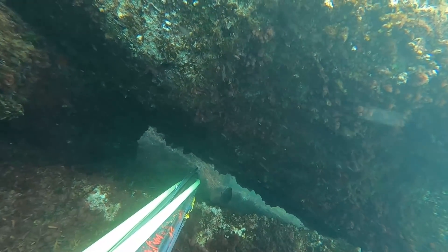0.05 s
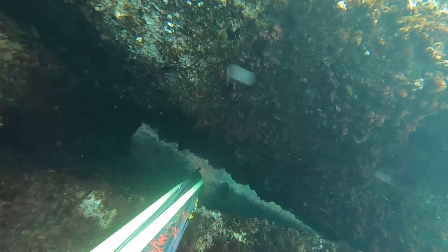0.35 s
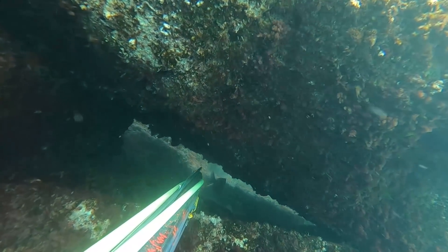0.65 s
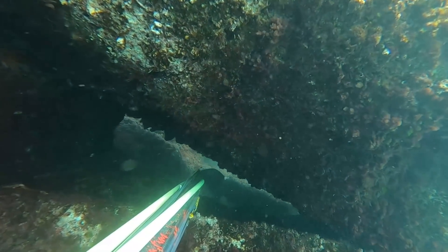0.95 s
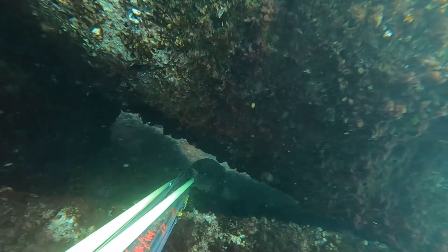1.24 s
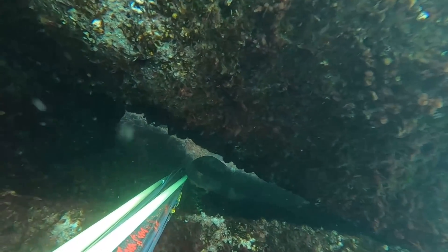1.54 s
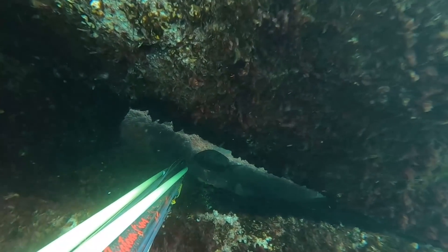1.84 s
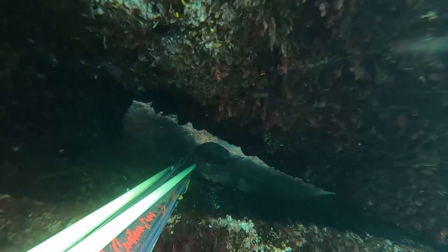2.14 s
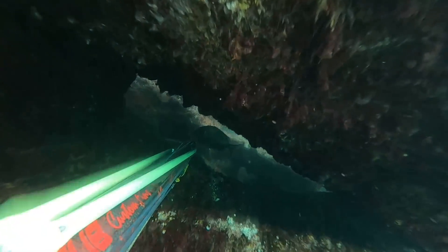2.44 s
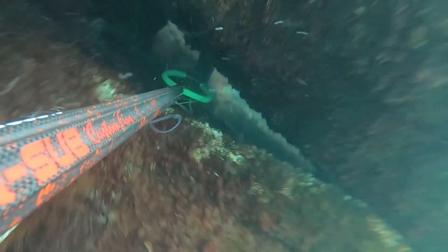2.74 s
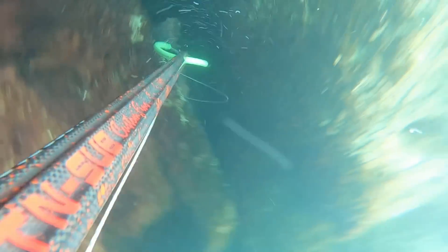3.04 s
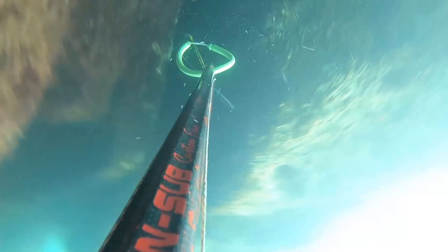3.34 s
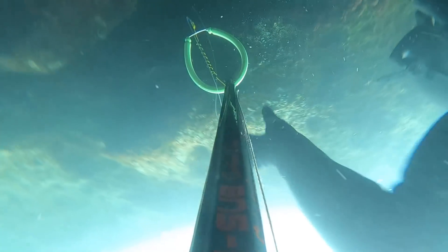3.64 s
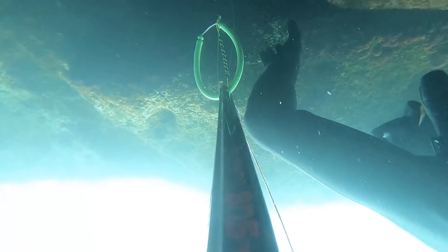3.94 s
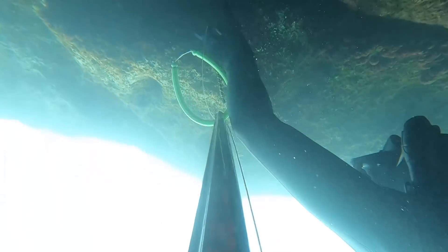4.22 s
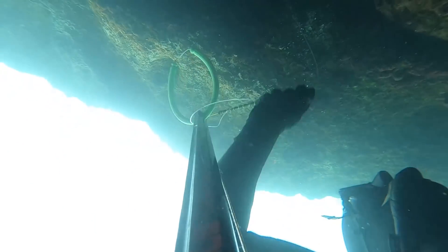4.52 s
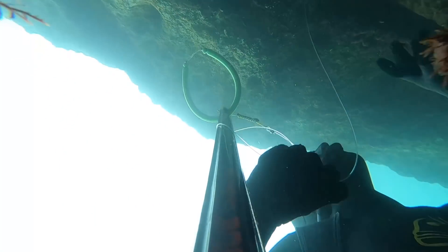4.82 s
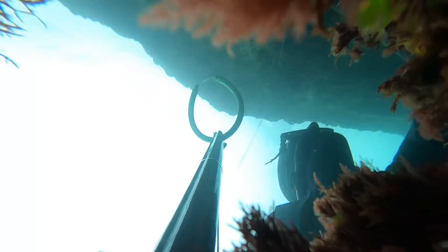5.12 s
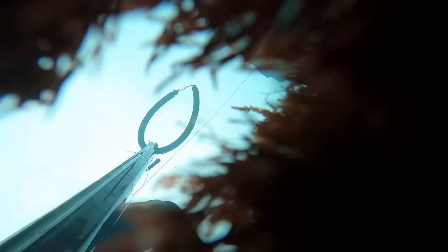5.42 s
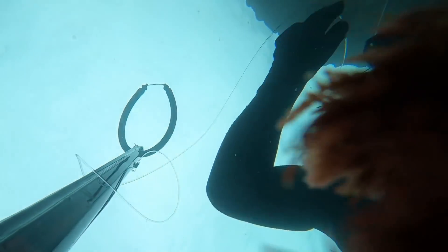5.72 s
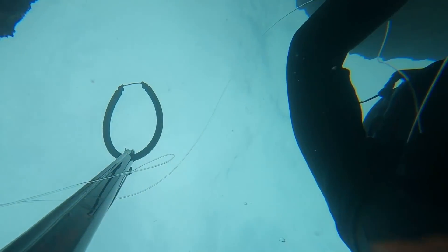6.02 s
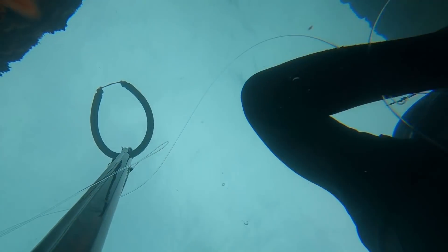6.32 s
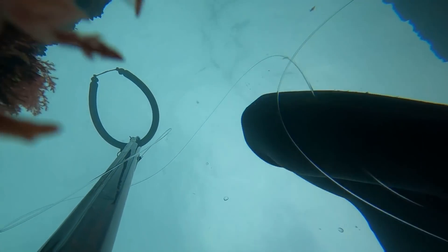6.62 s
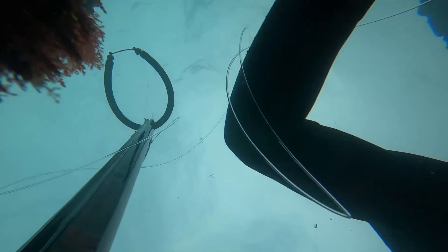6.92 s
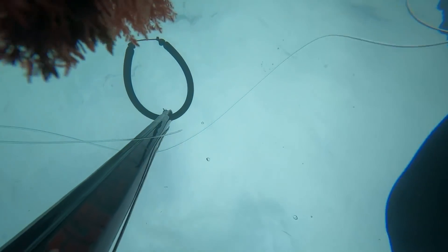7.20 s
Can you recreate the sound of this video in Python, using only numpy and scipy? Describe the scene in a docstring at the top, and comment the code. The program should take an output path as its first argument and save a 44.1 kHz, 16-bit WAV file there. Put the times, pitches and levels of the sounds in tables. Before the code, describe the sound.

A microphone in a housing on a speargun picks up the deep, fluttering rumble of water and tiny shrimp snaps. The gun goes off with a sharp, booming clack and rattling rebounds. Jerky rubs, knocks and short squeaks of line and rubber ring the barrel, growing louder as the water surges. Then come dry knocks and rustling from seaweed, a faint rasp of running line and a brief bubbly glug.

```python
"""Speargun shot under water

A camera in its housing rides on the barrel of a speargun, which sways and rumbles in the flow while
shrimp tick. The gun fires; line and rubber bands then drag and squeak by stick-slip friction, ringing
the hollow barrel. The diver pushes through seaweed, which brushes and knocks the housing, and a few
air pockets glug as they break loose."""
import sys
import numpy as np
from scipy import signal
from scipy.fft import rfft, irfft
from scipy.io import wavfile
from scipy.ndimage import uniform_filter1d

SR = 44100
rng = np.random.default_rng(int(sys.argv[2]) if len(sys.argv) > 2 else 0)


def persist_wave(psi):
    """Save psi, clipped to +-1, as 16-bit WAV."""
    counts = np.round(np.clip(psi, -1, 1) * 32767).astype(np.int16)
    wavfile.write(sys.argv[1], SR, np.atleast_2d(counts).T)


N = 320166
T = np.arange(N) / SR

# the shot, its rebounds and other blows on the gun:
# (time [s], boom pitch [Hz], boom level [dB], boom t60 [s], crack level [dB])
GUN_BLOWS = [(1.298, 98, -23.5, 0.14, -74), (1.9, 126, -37, 0.17, -73), (2.092, 233, -44.5, 0.032, -50.5),
             (2.529, 390, -33, 0.015, -35.5), (2.54, 200, -15, 0.032, -46), (2.544, 1130, -31, 0.038, -32),
             (2.551, 450, -2, 0.031, -12.5), (2.57, 850, 1.5, 0.0046, -8), (2.572, 186, 9.5, 0.012, -24),
             (2.582, 430, -0.5, 0.028, -27), (2.585, 170, 5.5, 0.012, -31), (2.587, 530, -9, 0.018, -30),
             (2.59, 1000, -16, 0.022, -24), (2.606, 1350, -21.5, 0.015, -33),
             (2.6225, 680, -17.5, 0.014, -32), (2.625, 115, 1.5, 0.022, -48),
             (2.636, 480, -15.5, 0.036, -43), (2.651, 520, -13.5, 0.018, -35), (2.654, 230, -5, 0.014, -45),
             (2.668, 1000, -22.5, 0.041, -27.5), (2.688, 600, -18, 0.017, -23),
             (2.841, 440, -19, 0.024, -38), (2.864, 450, -26.5, 0.041, -45.5),
             (2.993, 511, -20.5, 0.042, -39), (3.044, 480, -25, 0.023, -52),
             (3.133, 484, -25, 0.026, -54.5), (3.501, 460, -21.5, 0.04, -36.5),
             (3.701, 490, -44, 0.025, -29.5), (3.815, 460, -41, 0.062, -13.5), (3.909, 124, -5, 0.023, -53),
             (4.004, 404, -29, 0.024, -46), (4.361, 94, -12, 0.11, -63.5), (4.3965, 640, -9, 0.013, -35),
             (4.5335, 590, -12, 0.018, -32.5), (4.578, 290, -22, .03, -48),
             (4.7315, 593, -15, 0.014, -22.5), (4.7335, 415, -2, 0.017, -33)]
# modes of the hollow barrel: (frequency [Hz], bandwidth [Hz], gain [dB], left minus right [dB])
BARREL_MODES = [(224, 44, -7.5, -0.5), (266.3, 39, 4.5, -0.5), (333, 16, 7.5, -2.5), (456.5, 28, 2, 1),
                (509, 40, 4, -1), (580, 55, 7, -0.5), (698, 130, -8, 1), (796, 72, -4.5, 1.5),
                (878, 119, -2.5, -5.5), (1228, 600, -14, 17), (1347, 85, 4, 5.5), (1600, 29, -10.5, 3),
                (1780, 26, -7.5, -2), (2230, 170, -13.5, 6.5), (2610, 110, -12.5, 9),
                (3080, 120, -11.5, 3.5), (3300, 32, -16, -3), (3630, 280, -21.5, -7), (4460, 510, -31, -4),
                (5670, 250, -28.5, -14.5), (6250, 110, -33, -11)]
# spectrum of a crack on the gun: (frequency [Hz], gain [dB])
CRACK_SPECTRUM = [(300, 1.5), (700, 8), (1500, 0.5), (2200, 1), (3150, -2.5), (4100, -14), (6000, -16.5),
                  (8500, -36.5), (11000, -35), (15000, -56)]
def gun_blows():
    """Impact excitation: each blow booms, cracks and briefly rings the barrel's modes."""
    booms, cracks = impacts(GUN_BLOWS)
    cracks = undb(2) * colour(cracks, CRACK_SPECTRUM)
    ring = undb(-10) * ring_modes(booms, BARREL_MODES)
    ring += undb(-7) * ring_modes(band(cracks, 700, 4000), BARREL_MODES)
    return undb(1.5) * booms + cracks + ring + undb(6) * resonate(cracks, 3050, 450)


# the spear running along the barrel: (time [s], level [dB])
RUSH_LEVEL = [(2.538, -50.5), (2.548, -30.5), (2.565, -39), (2.585, -29.5), (2.595, -44.5), (2.603, -52.5),
              (2.67, -48.5), (2.70, -65)]
def spear_rush():
    """Sliding friction: the spear running along the barrel makes a short broadband rush."""
    noise = colour(grit(4400, 1.5, 2700), CRACK_SPECTRUM)
    return steady(noise, .023) * envelope(RUSH_LEVEL)


# pulls of the line on the barrel: (start [s], end [s], level [dB], treble over bass [dB])
LINE_PULLS = [(2.716, 2.72, -35, -16), (2.778, 2.785, -48, -16), (2.834, 2.848, -37, -12.5),
              (2.856, 2.863, -38.5, -14), (2.884, 2.897, -32.5, -22), (2.909, 2.942, -35.5, -21),
              (2.96, 2.963, -35, -7), (2.992, 2.996, -23, -26), (3.038, 3.043, -26.5, -34),
              (3.081, 3.11, -36, -23), (3.129, 3.169, -37, -25), (3.184, 3.203, -33, -23.5),
              (3.241, 3.264, -34, -28.5), (3.312, 3.334, -25.5, -35), (3.333, 3.425, -24, -30),
              (3.469, 3.477, -42, -28), (3.499, 3.507, -26.5, -24), (3.532, 3.539, -29, -12.5),
              (3.549, 3.553, -32.5, -12), (3.567, 3.575, -27.5, -14.5), (3.582, 3.608, -34.5, -13.5),
              (3.621, 3.627, -38.5, -14), (3.63, 3.636, -39, -8.5), (3.644, 3.662, -52, -10),
              (3.693, 3.714, -39.5, -10), (3.745, 3.771, -40, -14.5), (3.782, 3.798, -42, -4.5),
              (3.816, 3.833, -31.5, -14.5), (3.912, 3.923, -26.5, -26.5), (3.947, 3.957, -36, -24),
              (3.962, 3.964, -22.5, -21.5), (3.992, 3.997, -25, -28.5), (4.002, 4.007, -25.5, -25.5),
              (4.013, 4.023, -28, -27), (4.036, 4.043, -21.5, -20.5), (4.318, 4.338, -24.5, -21.5),
              (4.345, 4.35, -26.5, -20), (4.392, 4.443, -20.5, -16), (4.455, 4.483, -29.5, -16.5),
              (4.49, 4.519, -23, -20.5), (4.533, 4.539, -12, -25), (4.574, 4.579, -25.5, -28),
              (4.6, 4.603, -29, -23), (4.628, 4.638, -27, -24), (4.705, 4.725, -20, -16),
              (4.735, 4.742, -15.5, -34), (4.784, 4.796, -15.5, -22), (4.816, 4.847, -32, -18.5),
              (4.881, 4.901, -30, -24.5), (5.287, 5.324, -19, -33), (5.341, 5.345, -24.5, -9),
              (5.438, 5.48, -28, -32), (5.59, 5.667, -29.5, -30)]
def line_scrapes():
    """Stick-slip friction: each pull is a train of random slips that ring the barrel."""
    out, responses = np.zeros((2, N)), slip_responses()
    for start, end, db, bright_db in LINE_PULLS:
        t = T[:max(int((end - start) * SR), 1)]
        chance, size = rng.random(SR // 4)[:len(t)], rng.standard_normal(SR // 4)[:len(t)]
        slips = (chance < 700 / SR) * size * np.exp(-t / .22)
        slips[0] = 2.34  # the line breaks free with a jerk
        for response, bright_share in zip(responses, (0, .65, 1)):
            pull = signal.fftconvolve(response, slips[None], axes=1)
            pull *= np.sqrt(len(t) / pull.shape[1]) / rms(pull)  # energy follows duration
            add(out, start, pull * undb(db + bright_share * bright_db - 3))
    return out


def slip_responses():
    """Dispersion: one slip runs down the barrel as a chirp, returned as low, middle and high bands."""
    chirp = disperse(signal.unit_impulse(4096), lag_s=.0025)
    ring = ring_modes(chirp, BARREL_MODES)
    low, middle = band(ring, 150, 826, order=5), band(ring, 803, 1956, order=5)
    high = band(ring, 1900, 3480, order=5) + undb(-4.5) * band(ring, 5230, 6250)
    high += undb(-21) * band(ring, 4000, 13000)
    return low, middle, high


# slack line trailing along the barrel: (start [s], end [s], level [dB])
LINE_TRAILS = [(2.64, 2.81, -44), (2.89, 3.0, -44.5), (3.13, 3.42, -44), (3.56, 3.84, -55.5),
               (4.25, 4.84, -47)]
def trailing_line():
    """Sliding friction: the slack line's dense, tiny slips merge into a dull rub."""
    low, middle, high = slip_responses()
    response = low + undb(-18) * middle + undb(-17.5) * high
    level = swells(LINE_TRAILS, attack_s=.01, release_s=.028) * undb(6 + 1.6 * wander(40))
    rub = signal.oaconvolve(grit(1000, 5.4, 5000), response, axes=1)[:, :N]
    return steady(rub, .14) * level


# rubber, line and weed squeaking: (start [s], end [s], first slip rate [Hz], midway rate [Hz],
# last rate [Hz], level [dB], unevenness of the rate [0-1])
SQUEAK_GLIDES = [(2.758, 2.777, 496, 527, 555, -32, 0), (2.959, 2.966, 2230, 2300, 2420, -38.5, 0.02),
                 (3.078, 3.095, 887, 1080, 1450, -40, 0.05), (3.138, 3.206, 483.2, 577, 775, -22.5, .04),
                 (3.327, 3.442, 345.3, 333, 317, -29, 0.04), (3.405, 3.422, 606, 575, 470, -24, 0.1),
                 (4.392, 4.404, 521, 660, 800, -14, 0.22), (4.402, 4.42, 1276, 1740, 1420, -16.5, 0.18),
                 (4.423, 4.445, 1159, 912, 560, -19, 0.11), (4.426, 4.438, 2100, 2230, 2170, -23.5, 0),
                 (4.469, 4.478, 1210, 1413, 1740, -16.5, 0.11), (4.489, 4.504, 1639, 1267, 750, -13, .15),
                 (4.499, 4.523, 548.6, 403, 298, -10, 0), (4.533, 4.545, 616, 428, 320, -17, 0.09),
                 (5.082, 5.1, 536, 684, 1080, -24.5, 0.18), (5.288, 5.303, 1380, 1455, 1550, -25.5, .14),
                 (5.311, 5.32, 1600, 1745, 1830, -21, 0.05), (5.296, 5.339, 635, 594, 555, -25, 0.02),
                 (5.448, 5.483, 580.4, 591, 586, -22.5, .05), (6.4, 6.423, 4220, 4570, 5140, -40, 0.07),
                 (6.514, 6.515, 2830, 2820, 2950, -27.5, 0), (6.514, 6.515, 5500, 5640, 5840, -37, 0),
                 (6.524, 6.537, 3890, 4960, 7500, -34.5, 0.03), (6.567, 6.655, 3300, 3740, 4040, -43, 0.1)]
def squeaks():
    """Stick-slip oscillation: the slip rate sets the pitch, heard directly and through the barrel."""
    out, jitter = np.zeros((2, N)), wander(700)
    grip = undb(5 * wander(1100))
    crunch = steady(band(rng.standard_normal(N), 500, 2510), .05)
    for start, end, *glide_hz, db, uneven in SQUEAK_GLIDES:
        span = slice(int((start - .02) * SR), int((end + .03) * SR))
        t = T[span]
        progress = (t - start) / (end - start)
        slip_hz = np.interp(progress, [0, .5, 1], glide_hz) * (1 + uneven * jitter[span])
        phase = 2 * np.pi * np.cumsum(slip_hz) / SR
        tone = np.sin(phase) + undb(-19.5) * np.sin(2 * phase)
        slip = (tone + 1.4 * uneven * crunch[span]) * grip[span]  # ragged slips crunch
        squeak = steady(ring_modes(slip, BARREL_MODES), .0048) + undb(-8) * slip
        gate = np.clip(np.minimum(t - start, end - t) / .0057 + 1, 0, 1)
        swell_db = np.interp(progress, [0, .31, 1], [-8.5, 0, -4])  # fades as the grip lets go
        add(out, t[0], squeak * gate * undb(db + swell_db - 4.5))
    return out


def running_line(centre_hz=1070, width_hz=240):
    """Resonant filtering of friction: the line runs out in a grainy rasp under a thin sizzle."""
    slips = grit(900, 2.2, 3000)
    rasp = steady(steep_resonance(slips, centre_hz, width_hz), .36)
    sizzle = undb(-19.5) * steady(band(slips, 4200, 5500), .11)
    return (rasp + sizzle) * swells([(5.737, 6.043, -39)], attack_s=.19, release_s=.17)


# water streaming past the gun: (time [s], level [dB])
FLOW_LEVEL = [(0, -29), (.5, -29), (.75, -24.5), (1.78, -17.5), (1.9, -24.5), (2.02, -18), (2.55, -16.5),
              (2.9, -28.5), (3.33, -26.5), (3.5, -31.5), (3.85, -35.5), (4.28, -28.5), (4.42, -14),
              (4.85, -15), (5.0, -23), (5.25, -14), (5.55, -21.5), (5.88, -34.5), (6.55, -33), (7.26, -33)]
# tugs that make the barrel shudder: (start [s], end [s], level [dB])
BARREL_TUGS = [(2.54, 2.575, -10), (2.7, 2.78, -29.5), (3.05, 3.13, -30), (3.2, 3.85, -40),
               (4.35, 4.41, -20), (4.7, 4.77, -20), (4.84, 4.9, -27.5), (5.12, 5.27, -25), (5.6, 5.66, -28),
               (6.46, 6.82, -36), (7.17, 7.26, -30)]
# jerks on the line that set the barrel swinging: (start [s], end [s], level [dB])
LINE_JERKS = [(3.06, 3.13, -24.5), (3.295, 3.34, -22.5), (3.905, 4.1, -16)]
# bending modes of the barrel: (frequency [Hz], bandwidth [Hz], gain [dB])
BENDING_MODES = [(57, 38, -15.5), (94.2, 11, -1.5)]
def barrel_rumble(sway_hz=20.9):
    """Forced beam vibration: the lowest mode sways; eddies, tugs, weed and line drive higher ones."""
    flow, contact = envelope(FLOW_LEVEL), envelope(WEED_CONTACT)
    tug = swells(BARREL_TUGS, attack_s=.023, release_s=.037)
    trail = swells(LINE_TRAILS, attack_s=.095, release_s=.013)
    sway_drive = flow + swells(LINE_JERKS, attack_s=.026, release_s=.092)
    # independent forces add in power
    buffet_forces = [flow * undb(-12), tug * undb(-4), contact * undb(19.5), np.full(N, undb(-50))]
    bend_forces = [flow * undb(-28.5), tug, contact * undb(21), trail * undb(9.5)]
    buffet_drive, bend_drive = np.linalg.norm([buffet_forces, bend_forces], axis=1)
    phase = 2 * np.pi * np.cumsum(sway_hz * (1 + .09 * wander(12))) / SR
    eddies = grit(3000, 2.4, 1300)
    ring = sum(undb(db) * resonate(eddies, hz, width) for hz, width, db in BENDING_MODES)
    shudder = undb(-8) * eddies + ring
    buffet = steady(band(shudder, 28, 59), .27) * buffet_drive * undb(2.5)
    bend = steady(band(shudder, 68, 131.8, order=3), .014) * bend_drive * undb(-2 + 2.5 * wander(18))
    twist = np.array([[.08], [-.08]])  # the barrel twists a little, so one microphone leads
    sway = np.sqrt(2) * np.sin(phase + twist) * sway_drive * undb(-.5 + 2.2 * wander(16))
    return sway + buffet + bend


# stalks and line knocking on the housing:
# (time [s], boom pitch [Hz], boom level [dB], boom t60 [s], crack level [dB])
HOUSING_KNOCKS = [(1.06, 1480, -43, 0.027, -62), (5.171, 333, -4.5, 0.014, -3), (5.179, 165, 3, 0.022, -31),
                  (5.2055, 487, 0.5, 0.0034, -3.5), (5.228, 322, -14, 0.034, -11.5),
                  (5.235, 160, -16.5, 0.057, -10), (5.264, 590, -34, .018, -17.5),
                  (5.616, 203, -20.5, 0.1, -39), (5.907, 1100, -23, .015, -33),
                  (5.987, 1100, -22, 0.019, -38), (6.396, 1300, -46, .012, -35.5),
                  (6.422, 520, -50, 0.015, -36), (6.486, 170, -19, 0.018, -27),
                  (6.558, 339, -28, 0.021, -30.5), (6.97, 513, -46, 0.018, -25.5),
                  (7.022, 900, -43, .012, -41), (7.171, 1200, -40, .012, -32)]
# modes of the housing: (frequency [Hz], bandwidth [Hz], gain [dB], left minus right [dB])
HOUSING_MODES = [(210, 45, 1, -1), (312, 200, 3, -1), (507.6, 64, 3, 0.5), (585.3, 130, 2, -1),
                 (728, 140, -7, 1.5), (898, 14, -6, 6), (1081, 130, -4.5, 1), (1435, 69, -5, 1),
                 (1590, 500, -28, -14.5), (2560, 240, -22, 3.5), (2870, 530, -13.5, 1),
                 (3960, 400, -20.5, 2.5), (4535, 1400, -26.5, -11), (5550, 930, -38.5, -2),
                 (6200, 990, -42.5, -1), (10800, 15000, -43, 14)]
# spectrum of a crack on the housing: (frequency [Hz], gain [dB])
KNOCK_SPECTRUM = [(300, 0.5), (550, 7.5), (1100, 7.5), (1500, 5), (2200, -15.5), (3100, 0), (4100, -12),
                  (6000, -22.5), (8000, -46), (11000, -38), (15000, -58)]
def housing_knocks():
    """Structure-borne sound: knocks right on the housing arrive dry, with a faint ring."""
    booms, cracks = impacts(HOUSING_KNOCKS)
    cracks = undb(4.5) * colour(cracks, KNOCK_SPECTRUM)
    return booms + cracks + undb(-18) * ring_modes(cracks, HOUSING_MODES)


# how hard the weed presses on the housing: (time [s], level [dB])
WEED_CONTACT = [(4.56, -84.5), (4.72, -55.5), (4.82, -67.5), (5.03, -66), (5.17, -44), (5.29, -54),
                (5.45, -55.5), (5.73, -68), (5.95, -60.5), (6.32, -65), (6.55, -58), (6.88, -62.5),
                (7.26, -61.5)]
def weed_brushing():
    """Friction noise: fine bristles follow the contact; slosh and rub grow more slowly with it."""
    contact = envelope(WEED_CONTACT)
    shell = ring_modes(grit(2200, 4.24, 3000), HOUSING_MODES)
    slosh = steady(band(shell, 152, 710), .013) * undb(3.5 + 5.8 * wander(30))
    rub = steady(band(shell, 916, 1797), .23) * undb(2.5 + 2 * wander(40))
    rub += steady(band(shell, 2054, 3370), .14) * undb(-4.5 + 2.6 * wander(50))
    bristles = steady(band(shell, 2980, 5730), .18)
    bristles += undb(-16) * steady(band(shell, 5800, 12000, order=5), .06)
    return contact ** .8 * (slosh + rub) + contact * bristles * undb(3.5 + 2.7 * wander(70))


# air pockets breaking loose: (time [s], starting pitch [Hz], level [dB], t60 [s])
AIR_POCKETS = [(.975, 603, -52, 0.13), (1.135, 410, -43, 0.049), (1.184, 319, -42, 0.15),
               (1.203, 466, -39.5, 0.077), (2.31, 493, -40, 0.074), (5.303, 266, -23, 0.1),
               (6.848, 595, -10.5, 0.012), (6.869, 319, -10, 0.11), (6.877, 563, -16, 0.11),
               (6.886, 453, -7.5, 0.04), (6.895, 405, 5, 0.011), (7.042, 550, -12.5, 0.017)]
def glugs():
    """Bubble resonance: each air pocket rings as a damped sine of rising pitch."""
    out, t = np.zeros(N), T[:SR // 5]
    for start, hz, db, t60 in AIR_POCKETS:
        level = undb(db - 60 * t / t60) * (1 - np.exp(-t / .0014))
        add(out, start, level * np.sin(2 * np.pi * hz * t * (1 + 1.7 * t)))
    return out + undb(-7) * ring_modes(out, HOUSING_MODES)


# the nearest shrimp snapping: (time [s], level [dB])
NEAR_SNAPS = [(0.1042, -62), (0.2379, -65), (0.384, -59), (0.4614, -62), (0.6085, -66.5), (0.7831, -60),
              (0.8435, -47), (1.0237, -47.5), (1.059, -39), (1.1019, -51), (1.148, -56), (1.1657, -55),
              (1.1992, -46.5), (1.294, -48), (1.3409, -53), (1.4107, -61), (1.4346, -53), (1.565, -50.5),
              (1.591, -50), (1.7397, -48), (1.836, -56), (1.8566, -57), (1.9599, -53), (1.996, -40),
              (2.2204, -62), (2.3379, -41), (2.3985, -61), (2.4244, -57.5), (4.9466, -45)]
# spectrum of a snap: (frequency [Hz], gain [dB])
SNAP_SPECTRUM = [(500, -23.5), (1500, -5), (2200, -8), (3100, 1), (4000, -4), (5500, -8.5), (8000, -23.5),
                 (14000, -46)]
# the housing's thin front window: (frequency [Hz], bandwidth [Hz], gain [dB], left minus right [dB])
WINDOW_MODES = [(1130, 94, 2, 0.5), (1430, 260, 1.5, 1), (2220, 180, -5.5, -1), (2840, 200, 2.5, 7.5),
                (3460, 160, -1.5, -1.5), (4100, 230, -2.5, -0.5), (5100, 350, -7.5, -2.5)]
def shrimp(far_count=70):
    """Scattering: each snap, near or far, trails a short tail off the rocks and rings the window."""
    out, t = np.zeros((2, N)), T[:SR // 10]
    far_snaps = zip(rng.uniform(0, T[-1], far_count), -72.5 + 3 * rng.standard_normal(far_count))
    decay = np.exp(-t / .0045) + undb(-6.5) * np.exp(-t / .012)
    for start, db in [*NEAR_SNAPS, *far_snaps]:
        burst = rng.standard_normal((2, len(t))) * decay
        add(out, start, (burst + .52 * burst[::-1]) * undb(db))  # partly alike in both channels
    return undb(.5) * colour(out, SNAP_SPECTRUM) + undb(-12) * ring_modes(out, WINDOW_MODES)


# clusters of tiny snaps in the rocks: (start [s], end [s], level [dB])
SNAP_FLURRIES = [(1.02, 1.22, -66), (1.3, 1.335, -63), (1.345, 1.385, -68), (1.4, 1.44, -76.5),
                 (1.55, 1.63, -65.5), (1.66, 1.69, -76), (1.83, 1.88, -70), (2.08, 2.13, -67)]
def flurries():
    """Shot noise: tiny random snaps merge into a crackle that rings the window."""
    crackle = grit(650, 4.5, 2000)
    ring = ring_modes(crackle, WINDOW_MODES) + undb(-15) * colour(crackle, SNAP_SPECTRUM)
    level = undb(3.8 * wander(45)) * swells(SNAP_FLURRIES, attack_s=.01, release_s=.027)
    return steady(ring, .12) * level


# faint wash of the reef: (time [s], level [dB])
WASH_LEVEL = [(0, -73.5), (.6, -76), (.8, -63), (1.27, -69), (1.5, -69), (2.1, -71), (2.5, -68), (2.8, -65),
              (7.26, -66.5)]
# swirls round the housing: (start [s], end [s], level [dB])
WATER_SWIRLS = [(.1, .13, -77), (.28, .32, -71), (.52, .55, -70), (.96, 1.0, -56.5), (1.16, 1.21, -49.5),
                (2.28, 2.32, -50.5), (2.46, 2.52, -65.5), (4.55, 5.02, -46), (5.27, 5.4, -47),
                (5.72, 5.83, -45.5), (6.47, 6.72, -48.5), (6.72, 6.92, -37.5), (6.95, 7.26, -41)]
# spectrum of the reef's fizz: (frequency [Hz], gain [dB])
WASH_SPECTRUM = [(150, 8.5), (500, 0.5), (900, -7), (1500, -3), (2200, -7), (3000, -3), (4000, 0.5),
                 (5500, 2), (8000, -1), (15000, -4.5)]
def reef_wash():
    """Ambient noise: soft swirls and the reef's fizz, filtered by the housing's modes."""
    stir = envelope(WASH_LEVEL)
    swirl_level = stir + swells(WATER_SWIRLS, attack_s=.0034, release_s=.0066)
    water = colour(ring_modes(grit(7000, 5.2, 2800), HOUSING_MODES), WASH_SPECTRUM)
    swirl = steady(band(water, 170, 1300), .068) * swirl_level * undb(3.5 + 2 * wander(25))
    fizz_level = envelope(FLOW_LEVEL) * undb(-55 + 4.7 * wander(22.08)) + stir * undb(-22) + undb(-90.5)
    return swirl + steady(band(water, 1300, 14000), .1) * fizz_level


def impacts(table):
    """Damped vibration: each hit gives a boom that the water soon stops, and a sharp crack."""
    booms, cracks, t = np.zeros(N), np.zeros((2, N)), T[:SR // 5]
    crack_decay = np.exp(-t / .0012) + undb(-10) * np.exp(-t / .004)
    for start, hz, boom_db, t60, crack_db in table:
        # added mass: the pitch sags as water is dragged along
        phase = 2 * np.pi * (hz * t + .18 * (1 - np.exp(-t / .0011)))
        attack = 1 - np.exp(-t * hz / .25)
        add(booms, start, undb(boom_db - 60 * t / t60) * np.sin(phase) * attack)
        mid, side = rng.standard_normal((2, len(t))) * crack_decay
        add(cracks, start, undb(crack_db) * np.array([.71 * mid + .39 * side, .67 * mid - .39 * side]))
    return booms, cracks


def grit(per_second, spread_db, apart_hz):
    """Shot noise: random clicks of uneven size at two microphones, alike below apart_hz."""
    occurs = rng.random(N) < per_second / SR
    size = occurs * undb(spread_db * np.clip(rng.standard_normal(N), -2, 2))
    mid, side = size * rng.standard_normal((2, N))
    side = signal.sosfilt(signal.butter(1, apart_hz, "high", fs=SR, output="sos"), side)
    return np.array([mid + side, mid - side])


def disperse(x, lag_s, front_hz=4000):
    """Bending waves travel as the root of frequency, so a click arrives as a falling chirp."""
    hz = np.minimum(np.fft.rfftfreq(len(x), 1 / SR), front_hz)
    phase = 2 * np.pi * lag_s * (2 * np.sqrt(front_hz * hz) - hz)
    return irfft(rfft(x) * np.exp(-1j * phase), len(x))


def ring_modes(x, modes):
    """Modal superposition: x rings a set of resonances, each leaning to one microphone."""
    click, sides = signal.unit_impulse(8192), np.array([[.5], [-.5]])
    response = sum(undb(db + pan * sides) * steep_resonance(click, hz, width)
                   for hz, width, db, pan in modes)
    return signal.fftconvolve(np.atleast_2d(x), response, axes=1)[:, :x.shape[-1]]


def resonate(x, hz, width_hz):
    """Second-order resonance, gain 1 at its centre."""
    return signal.lfilter(*signal.iirpeak(hz, hz / width_hz, fs=SR), x + 1e-18)


def steep_resonance(x, hz, width_hz):
    """Two resonances in cascade steepen the skirts."""
    return resonate(resonate(x, hz, width_hz), hz, hz / 2)


def band(x, lo_hz, hi_hz, order=4):
    """Maximally flat band-pass."""
    return signal.sosfilt(signal.butter(order, [lo_hz, hi_hz], "band", fs=SR, output="sos"), x + 1e-18)


def colour(x, spectrum, size=1024):
    """Minimum-phase filter through (frequency [Hz], gain [dB]) points."""
    hz, db = np.transpose(spectrum)
    grid_hz = np.linspace(1, SR / 2, size // 2 + 1)
    magnitude = undb(np.interp(np.log(grid_hz), np.log(hz), db))
    cepstrum = irfft(np.log(magnitude))
    cepstrum[1:size // 2] *= 2  # folding the cepstrum makes the filter causal
    cepstrum[size // 2 + 1:] = 0
    response = irfft(np.exp(rfft(cepstrum)))
    return signal.oaconvolve(x, response[None], axes=-1)[:, :N]


def arrive(x, left_lead_s, pan_db):
    """Path difference: sound reaches the nearer microphone sooner and louder."""
    sides = np.array([[.5], [-.5]])
    shift = np.exp(2j * np.pi * np.fft.rfftfreq(N, 1 / SR) * left_lead_s * sides)
    return irfft(rfft(x) * shift, N) * undb(pan_db * sides)


def envelope(table):
    """Gain through (time [s], level [dB]) points, fading to silence outside them."""
    times, db = np.transpose(table)
    inside = np.interp(T, [times[0] - .03, times[0], times[-1], times[-1] + .03], [0, 1, 1, 0])
    return inside * undb(np.interp(T, times, db))


def swells(table, attack_s, release_s):
    """Gain from (start [s], end [s], level [dB]) rows: linear rise, hold, exponential decay."""
    return sum(undb(db) * np.clip((T - start) / attack_s, 0, 1)
               * np.exp(-np.maximum(T - end, 0) / release_s) for start, end, db in table)


def wander(rate_hz):
    """Smooth random modulation of unit RMS."""
    hold = int(SR / rate_hz)
    steps = np.repeat(rng.standard_normal(N // hold + 1), hold)[:N]
    smooth = uniform_filter1d(uniform_filter1d(steps, hold), hold)
    return smooth / rms(smooth)


def steady(x, window_s):
    """Division by the running RMS holds the level near 1."""
    power = uniform_filter1d(np.mean(np.atleast_2d(x) ** 2, axis=0), int(window_s * SR))
    return x / np.sqrt(np.abs(uniform_filter1d(power, int(window_s * SR / 2))) + 1e-18)


def add(out, start_s, x):
    """Superpose x on out from start_s."""
    i = max(int(start_s * SR), 0)
    out[..., i:i + x.shape[-1]] += x[..., :N - i]


def undb(db):
    """Decibels to amplitude ratio."""
    return 10 ** (np.asarray(db) / 20)


def rms(x):
    """Root mean square."""
    return np.sqrt(np.mean(x ** 2)) + 1e-12


def scene():
    """Superposition: all reaches the camera through water and mount; the weed lies to the right."""
    gun = line_scrapes() + trailing_line() + squeaks() + gun_blows() + spear_rush()
    weed = arrive(weed_brushing() + housing_knocks(), left_lead_s=-26e-6, pan_db=-.5)
    rumble = barrel_rumble()
    reef = reef_wash() + shrimp() + flurries()
    return undb(-.5) * gun + running_line() + rumble + weed + glugs() + reef


def record(dry):
    """Soft saturation and band limiting: the camera rounds the highest peaks and cuts above 14 kHz."""
    rounded = dry / (1 + dry ** 6) ** (1 / 6)
    return signal.sosfilt(signal.ellip(8, .2, 70, 14000, fs=SR, output="sos"), rounded)


dry = scene()
out = record(dry)
persist_wave(out)
```